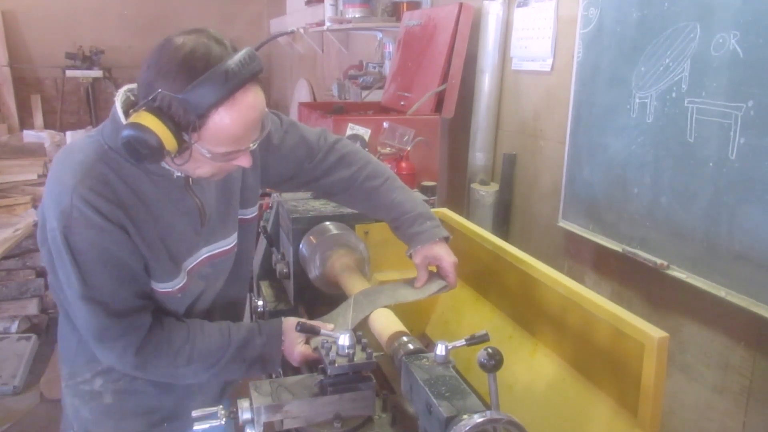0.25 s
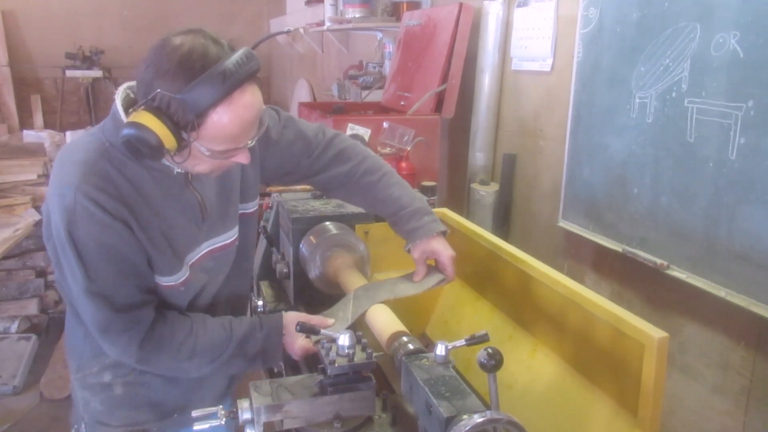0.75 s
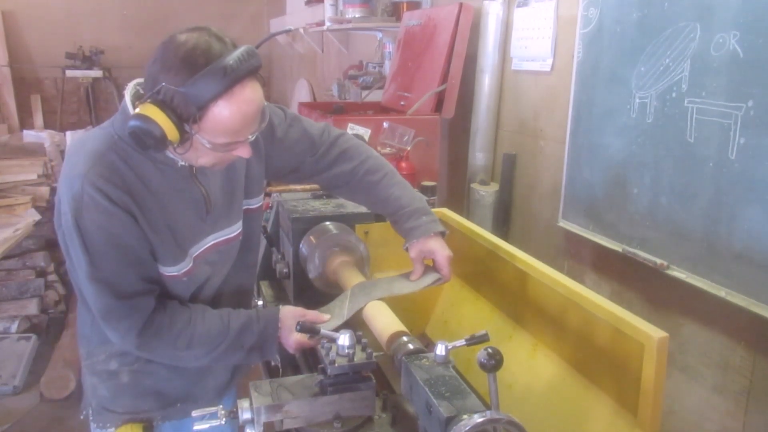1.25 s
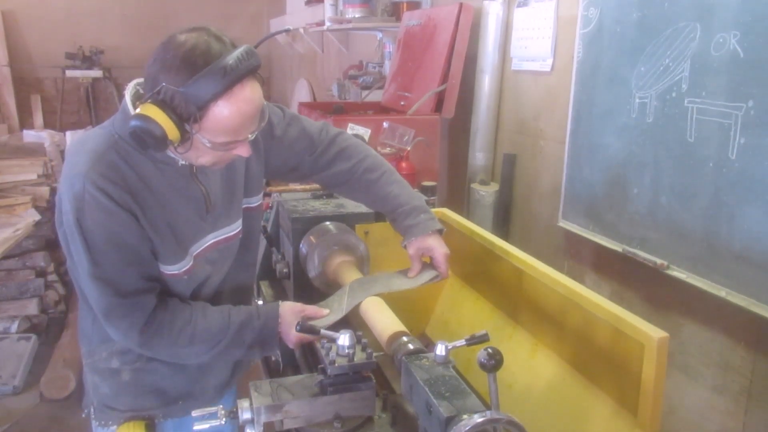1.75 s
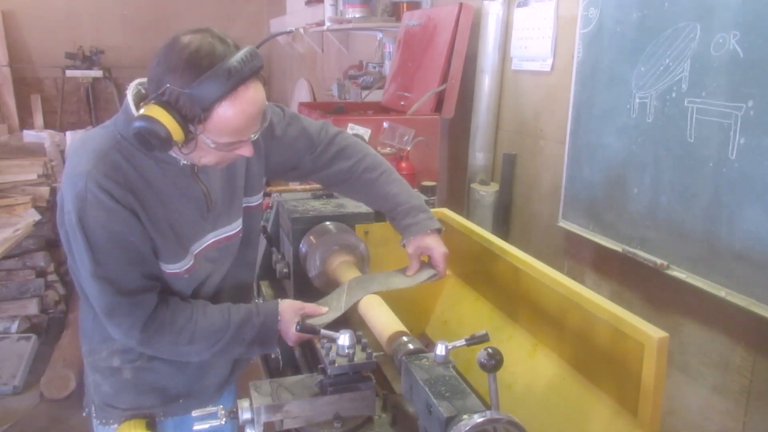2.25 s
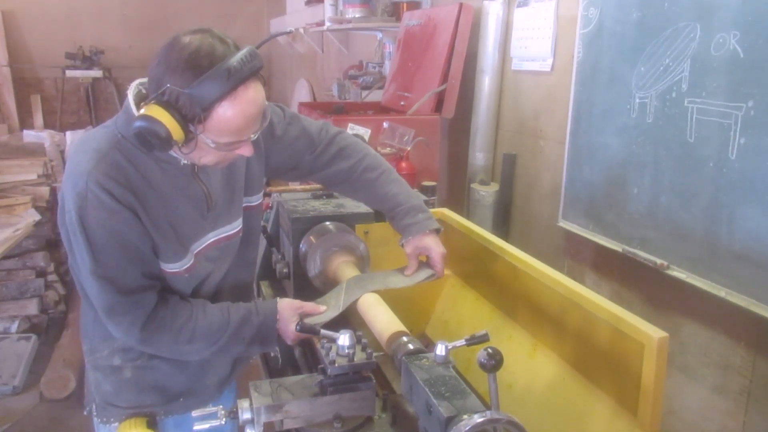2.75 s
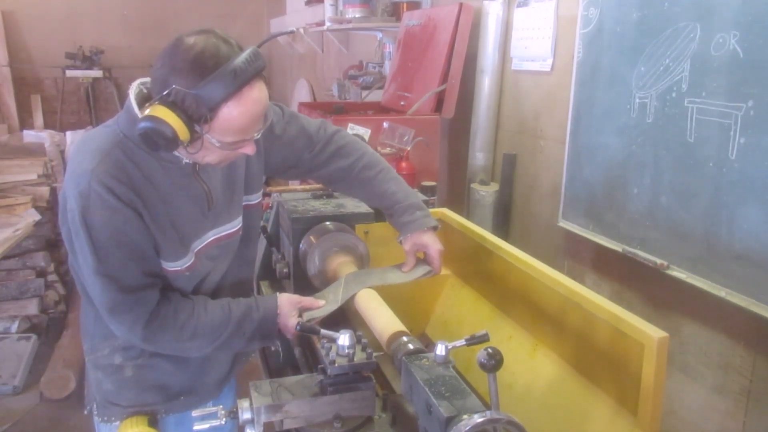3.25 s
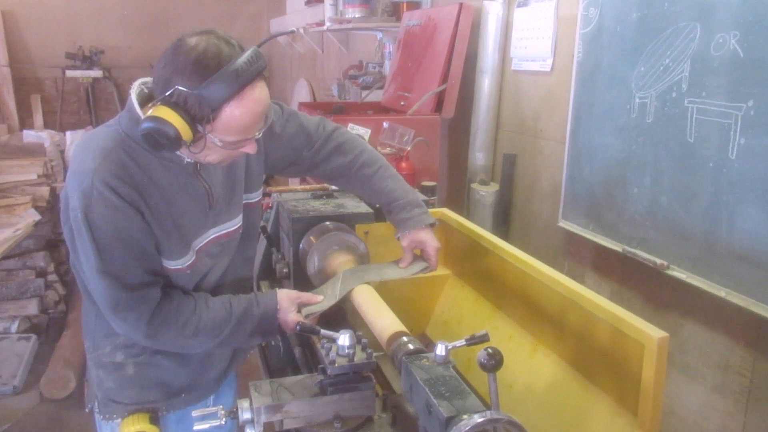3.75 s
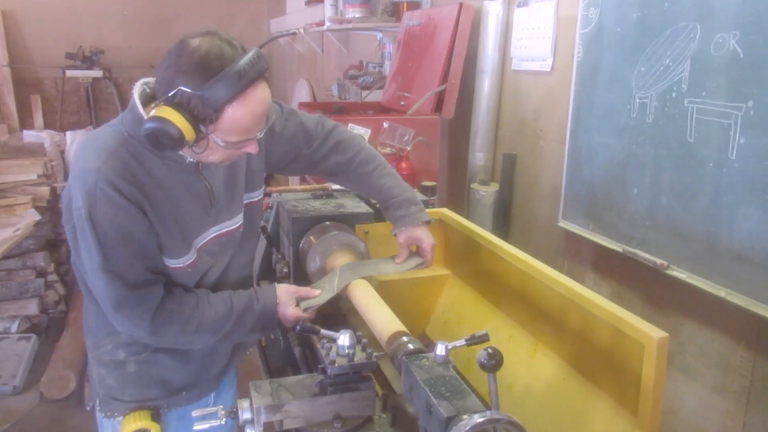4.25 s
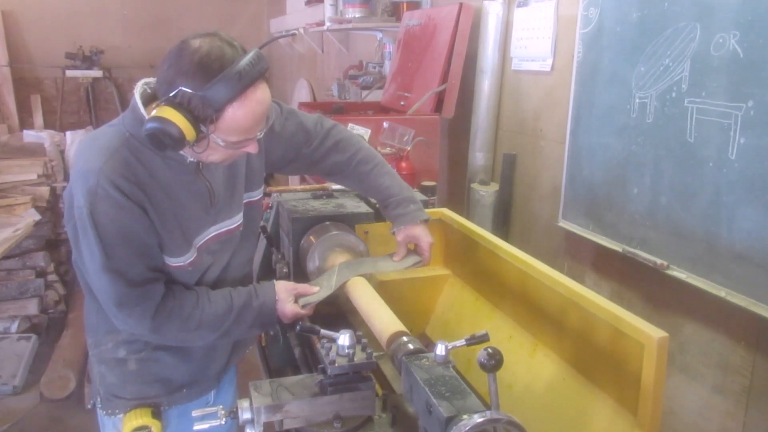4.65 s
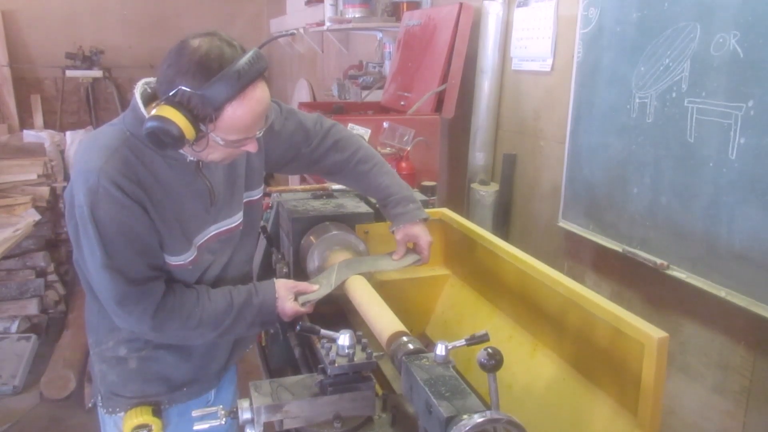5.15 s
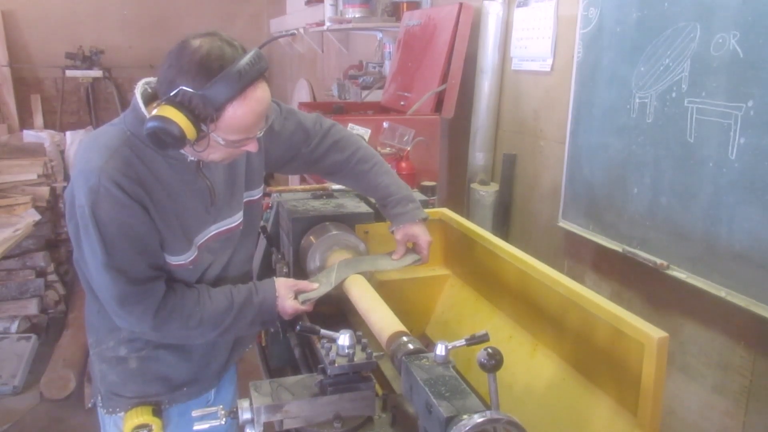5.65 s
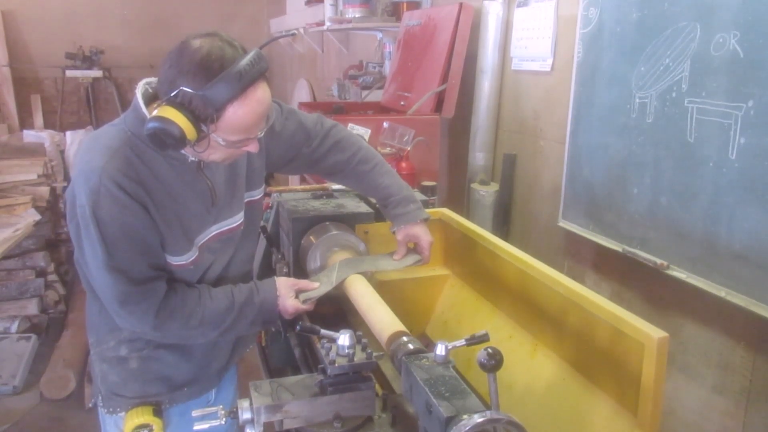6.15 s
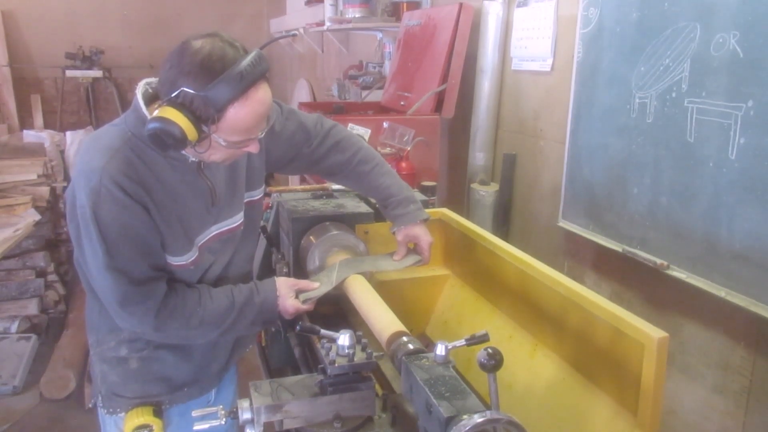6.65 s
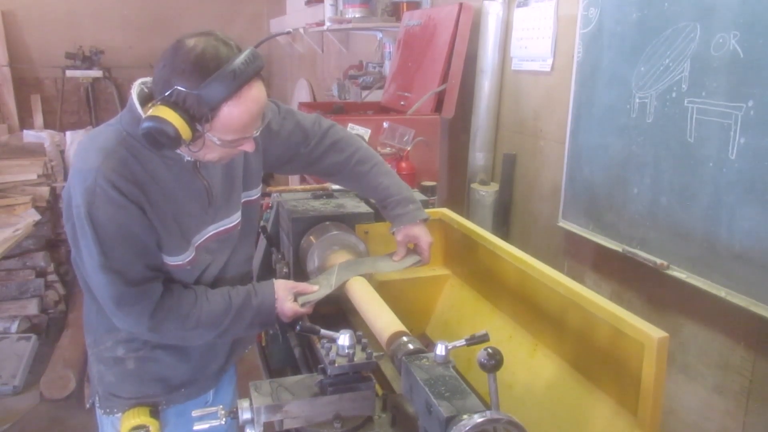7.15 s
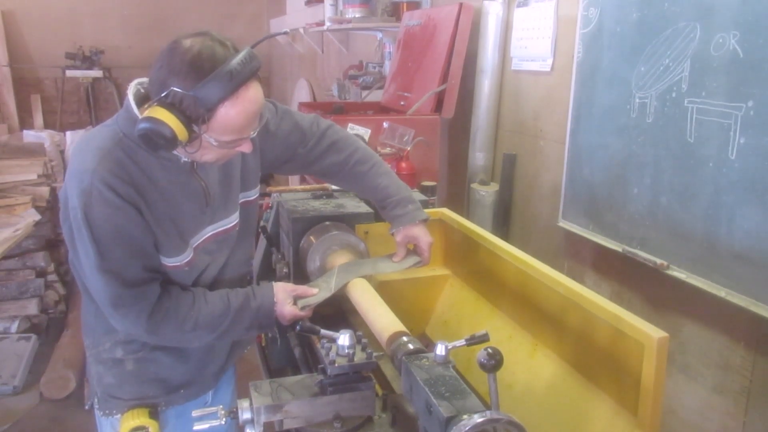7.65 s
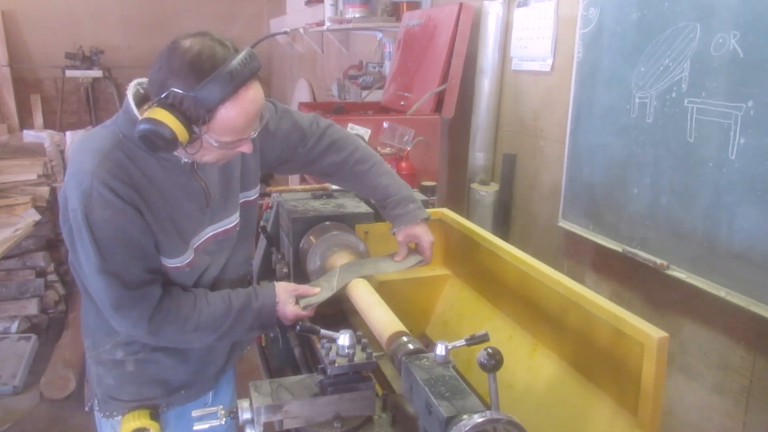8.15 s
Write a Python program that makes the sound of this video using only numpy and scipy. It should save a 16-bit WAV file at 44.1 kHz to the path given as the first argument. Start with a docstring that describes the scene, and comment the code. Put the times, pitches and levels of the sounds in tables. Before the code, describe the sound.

Abrasive cloth rasps continuously along a spinning wooden dowel, pulsing quickly with each turn, over a lathe's steady gear hum in a workshop.

```python
"""Abrasive cloth drawn along a spinning wooden dowel: shaped noise, coloured by resonances that change
with the cloth's place on the lathe and throbbing once a turn. Under it, motor and gears hum as sines
over a low noise rumble. Snaps of grit are short tone bursts, each followed by a dip of the whole sound.
Sparse decaying taps give the workshop's reverberation. One microphone, both channels alike."""
import sys
import numpy as np
from scipy import signal
from scipy.io import wavfile
from scipy.ndimage import uniform_filter1d

SR = 44100
rng = np.random.default_rng(int(sys.argv[2]) if len(sys.argv) > 2 else 0)


def to_wav(sig):
    """Store sig (one row per channel, or 1-D mono) as 16-bit WAV at the path in sys.argv[1].

    Samples outside -1..1 are clipped; the rate is SR.
    """
    pcm = np.clip(np.atleast_2d(sig), -1, 1) * 32767
    pcm = np.round(pcm).astype(np.int16)
    wavfile.write(sys.argv[1], SR, pcm.T)  # frames by channels


N = 371322  # samples

# Motor and gear tones, before load and dips: [f/Hz, rms level/dB]
MACHINE_TONES = [(88.5, -69), (95.6, -69), (104.1, -67), (120, -58), (150, -65), (210, -52), (224.9, -56),
                 (240, -36), (255.5, -52), (325.6, -56.5), (360, -46), (381.3, -52), (414.2, -50),
                 (438, -45), (446.2, -42), (455.5, -45), (469.4, -29.5), (478.2, -42), (501.2, -47),
                 (557.5, -46), (589.1, -51), (635.8, -47), (784.9, -52), (938.5, -46.5), (1273.1, -50),
                 (1325.5, -47), (1513.3, -40), (1922.6, -40.5), (2038.4, -40.5), (2261.9, -41),
                 (2269.9, -37.5), (2390.2, -34.5), (3026.5, -30.3), (4979.6, -47)]
# Spectral shape of the drive's rumble: [f/Hz, relative density/dB]
RUMBLE_SHAPE = [(25, -46), (60, -34), (100, -25), (180, -17.5), (250, -12.5), (350, -10), (460, -3),
                (560, -6), (750, -8), (950, -5.5), (1150, -6.5), (1600, -13.5), (3000, -30)]
# Spectral shape of the grit's rasp: [f/Hz, relative density/dB]
RASP_SHAPE = [(500, -46.5), (1000, -19), (1500, -10.5), (2000, -4), (2400, -2.5), (3000, -4), (3500, -7.5),
              (4200, -8.5), (5200, -6), (7000, -7.5), (8500, -11), (10500, -16), (13000, -23.5),
              (15000, -29.5)]
# Fixed resonances of dowel and bed, and the notches between them: [f/Hz, width/Hz, lift/dB]
BODY_MODES = [(460, 50, 4), (540, 30, 3), (640, 30, 3), (900, 110, 3), (1040, 60, -3), (1330, 60, 3),
              (1507, 90, 2), (1880, 90, 2), (1965, 70, -3), (2530, 80, -2), (2153, 90, 2.3), (2290, 90, 3),
              (2425, 90, 3), (2650, 130, 3), (3020, 120, 3), (3229, 120, 2), (4521, 90, 2), (4909, 90, 2),
              (5512, 90, 2.6), (6158, 90, 2.5), (6665, 90, 3.8), (7450, 90, 2.8), (8656, 90, 2.4)]
# Resonances heard only with the cloth near one place: [f/Hz, lift/dB, place/(0 start to 1 chuck)]
PLACE_MODES = [(3820, 4, .02), (4870, 4, 0), (630, 8, .2), (1710, 5, 0.3), (3830, 6.5, 0.39),
               (1164, 9, 0.34), (4700, 1.5, 0.3), (6220, 1.5, .37), (2630, 2.5, 0.53), (1464, 10, 0.5),
               (3380, 6.5, 0.55), (7800, 0.5, 0.45), (2390, 3.5, 0.82), (4540, 1.5, 0.72), (4120, 4, 0.9),
               (772, 5, 0.79), (870, 1, .9), (5430, 1.5, 0.75), (1890, 1.5, 0.84), (910, 3.5, 1.01),
               (1020, 5, 1.01), (1880, 3.5, 1.01), (2300, 7, 1.01), (2990, 4, 1), (3229, 3, 0.9),
               (3703, 7, 1.01), (4520, 7, 1), (4990, 5, 0.98), (5290, 5.5, 0.96), (6320, 4.5, 1.01),
               (6750, 4, 1.01), (7150, 4, 0.95)]
# The hands on the cloth: [t/s, pressure level/dB, extra treble level/dB]
HAND_PRESSURE = [(0, -1, -3.5), (.5, -0.5, -3.5), (1.1, -0.5, -3), (1.6, -1.5, -3.5), (2.5, 0.56, -4.5),
                 (3.2, -0.26, -3), (3.9, -1, -2), (4.4, -0.4, -4), (4.9, -2, -2.2), (6, -1.5, -2.5),
                 (6.8, -2.3, -1.5), (6.92, -3.5, -3), (7.5, -1.55, -3.5), (8.42, -1.6, -3.5)]
# Sharp snaps of grit: [t/s, peak level before dips/dB]
GRIT_SNAPS = [(.772, -12.5), (.946, -12), (2.337, -8.5), (2.795, -11.5), (3.747, -7.5), (4.412, -11.3),
              (6.049, -12), (6.624, -12.5)]
# Load on the gear pair that sings loudest: [t/s, level change/dB]
GEAR_LOAD = [(0, -2), (1, -0.5), (2.3, 0.5), (3.5, 1.5), (5.2, 0.5), (6.3, 0.5), (8.42, 1)]

RUMBLE_DB, RASP_DB = -31, -16.5  # rms levels ahead of the mix
SPINDLE_HZ, PULLEY_HZ = 13.512, 7.9
THROB_PHASE_TURNS = .56
# throb depth at the start of travel, at the chuck, and its wander; each band takes a share
THROB_DB, THROB_CHUCK_DB, THROB_WANDER_DB = 0.76, 1.73, 0.22
TREBLE_HZ = 3800  # where the rasp divides into body and treble
# cloth travel; places run from 0 (start) to 1 (chuck)
ARRIVE_S, LEAVE_S, SLIP, SLIP_S, RETURN_PER_S = 6.1, 6.84, 0.086, .06, .14
# span of places over which a mode rings, for modes at place 0 and at place 1
RING_REACH, RING_REACH_CHUCK = 0.38, 0.11
RING_WIDTH_HZ, RING_WIDTH_SHARE = 21, 0.026  # mode width: fixed part, and part per Hz of frequency
DROP_FROM_DB, DROP_PER_DB = -14.5, 0.5069  # snap level where dips begin; dip dB per snap dB above it
EDGE_HZ = 15030  # upper band limit


def gain_of(db):
    """Decibels to an amplitude factor."""
    return 10 ** (np.asarray(db) / 20)


def evened(x):
    """Scale to rms 1."""
    return x / np.sqrt(np.mean(x ** 2) + 1e-20)


def read(points, hz):
    """Read a spectrum table at the given frequencies, along a logarithmic axis."""
    f, value = np.transpose(points)
    return np.interp(np.log(hz + 1), np.log(f + 1), value)


def bump(x, centre, width):
    """A smooth peak of height 1 with the given width at half height."""
    return .5 ** ((2 * (x - centre) / width) ** 2)


def drift(shape, size):
    """Smooth random field of rms 1; size = samples averaged, twice over, along each axis."""
    field = rng.standard_normal(shape)
    for axis, count in enumerate(size):
        for _ in range(2):
            field = uniform_filter1d(field, count, axis)
    return evened(field)


def noise(field_db, hop):
    """Noise from random short-time spectra shaped by a frames x bins field of dB."""
    real, imaginary = rng.standard_normal((2,) + field_db.shape)
    spectra = (real + 1j * imaginary) * gain_of(field_db)
    return signal.istft(spectra.T, nperseg=4 * hop, noverlap=3 * hop)[1][:N]


def grid(hop):
    """Frame times (s) and bin frequencies (Hz)."""
    return np.arange(N // hop + 5) * hop / SR, np.fft.rfftfreq(4 * hop, 1 / SR)


def place(t):
    """The cloth travels steadily to the chuck, rests there, slips off quickly and comes back."""
    after = np.maximum(t - LEAVE_S, 0)
    travel = np.minimum(t / ARRIVE_S, 1)
    slipped = SLIP * np.minimum(after / SLIP_S, 1)
    return travel - slipped - RETURN_PER_S * after


def ringing(t, hz):
    """Lift in dB of the fixed resonances and of those that the cloth's place wakes."""
    at = place(t)[:, None]
    lift_db = sum(db * bump(hz, f, width) for f, width, db in BODY_MODES)
    for f, db, best in PLACE_MODES:
        reach = RING_REACH + (RING_REACH_CHUCK - RING_REACH) * best
        width_hz = RING_WIDTH_HZ + RING_WIDTH_SHARE * f
        lift_db = lift_db + db * bump(at, best, reach) * bump(hz, f, width_hz)
    return lift_db


def throb(share, early_turns, depth_db):
    """The dowel runs slightly out of true: the cloth bites harder once a turn."""
    t = np.arange(N) / SR
    turn = 2 * np.pi * (SPINDLE_HZ * t - THROB_PHASE_TURNS + early_turns)
    shape = np.cos(turn) + 0.53 * np.cos(2 * turn + 3.7) + 0.38 * np.cos(3 * turn + 0.71)
    return gain_of(share * depth_db * shape)


def rasp():
    """Countless grains scratch the wood; the noise takes the colour of whatever rings at that moment."""
    t, hz = grid(hop=256)
    s, *columns = np.transpose(HAND_PRESSURE)
    pressure_db, bright_db = (np.interp(t, s, c)[:, None] for c in columns)
    treble = 1 / (1 + (TREBLE_HZ / (hz + 1)) ** 6)
    field = read(RASP_SHAPE, hz) + pressure_db + treble * bright_db + ringing(t, hz)
    # many weak modes come and go
    field += 1.06 * drift(field.shape, size=[90, 2])
    # wide patches flicker as the cloth slips, more so the higher the frequency
    field += (0.39 + 0.62 * hz / 10000) * drift(field.shape, size=[5, 90])
    scratch = noise(field, hop=256)
    high_pass = signal.butter(2, TREBLE_HZ, "high", fs=SR, output="sos")
    top = signal.sosfiltfilt(high_pass, scratch)
    depth_db = THROB_DB + (THROB_CHUCK_DB - THROB_DB) * place(t)
    depth_db += THROB_WANDER_DB * drift(len(t), size=[40])
    depth_db = np.interp(np.arange(N) / SR, t, depth_db)
    # the treble throbs deeper and a little earlier in the turn
    body = (scratch - top) * throb(0.69, 0, depth_db)
    top = top * throb(0.87, 0.083, depth_db)
    return gain_of(RASP_DB) * evened(body + top)


def tones():
    """Sines at motor and gear rates; all flutter and beat with the pulley, the mains hum least."""
    t, steps, out = np.arange(N) / SR, np.arange(0, N + 512, 512), np.zeros(N)
    for hz, db in MACHINE_TONES:
        mains = abs(hz / 120 - round(hz / 120)) < .003  # multiples of 120 Hz
        share = .05 if mains else .15 if hz < 1000 else .1
        a, b = (np.interp(np.arange(N), steps, drift(len(steps), size=[3])) for _ in range(2))
        beat = 1.57 * share * np.cos(2 * np.pi * (PULLEY_HZ * t + rng.random()))
        flutter = share * (a + 1j * b)
        wave = (1 + beat + flutter) * np.exp(2j * np.pi * (hz * t + rng.random()))
        # load acts on the gear group around its loudest tone
        load_db = np.interp(t, *np.transpose(GEAR_LOAD)) * (400 < hz < 520)
        out += gain_of(db + load_db) * evened(wave.real)
    return out


def rumble():
    """Bearings, belt, gears and the bending dowel: low noise with lasting narrow ridges."""
    t, hz = grid(hop=1024)
    ridges = drift((len(t), len(hz)), size=[30, 1])
    field = read(RUMBLE_SHAPE, hz) + ringing(t, hz) + 2.0 * ridges
    return gain_of(RUMBLE_DB) * evened(noise(field, hop=1024))


def workshop(x):
    """Sparse taps of random sign die away; two such tails take turns as the hands and body shift."""
    at = np.arange(130, 13000, 20) + rng.integers(0, 20, (2, 644))  # tap delays in samples
    taps = np.zeros((2, 13100))
    decay = gain_of(-60 * at / SR / 0.29)  # 60 dB down in 0.29 s
    np.put_along_axis(taps, at, rng.choice([-1., 1.], at.shape) * decay, 1)
    lean = np.pi * np.arange(N) / SR / 4.0
    dull = signal.lfilter([.45], [1, -.55], x)  # wood and cloth in the room soak up treble
    fed = dull * np.array([np.cos(lean), np.sin(lean)])
    return signal.oaconvolve(fed, taps / np.linalg.norm(taps[0]), axes=1)[:, :N].sum(0)


def repeated(x, share):
    """The same wood and teeth come round again: a little sound recurs each turn, less in the treble."""
    lag = round(SR / SPINDLE_HZ)
    dull = signal.lfilter([.4], [1, -.6], x)
    out = np.zeros(N)
    out[lag:] += share * dull[:-lag]
    out[2 * lag:] += 0.26 * share * dull[:-2 * lag]
    return x + out


def snaps():
    """Very short bursts in the strongest resonance region, and the level dip that follows each."""
    t, out, dip_db = np.arange(N) / SR, np.zeros(N), np.zeros(N)
    for s, db in GRIT_SNAPS:
        out += gain_of(db) * np.cos(2 * np.pi * 2600 * (t - s)) * bump(t, s, 0.00035)
        after = np.maximum(t - s - .001, 0)
        # drops within milliseconds, creeps back over about a second
        course = (1 - np.exp(-after / 0.0033)) * np.exp(-after / 0.44)
        dip_db -= DROP_PER_DB * (db - DROP_FROM_DB) * course
    return out, gain_of(dip_db)


def scene():
    """Cloth, machine, snaps and room all reach one microphone; the dips act on their sum."""
    snap, dip = snaps()
    noisy = repeated(rumble() + rasp(), 0.055)
    direct = gain_of(-0.26) * noisy
    room = gain_of(-5.5) * workshop(noisy)
    mono = dip * (tones() + direct + room + snap)
    return np.array([mono, mono])


def record(dry):
    """Limit the band with a steep linear-phase low-pass."""
    low_pass = signal.firwin(1023, EDGE_HZ, window=("kaiser", 9), fs=SR)
    return signal.oaconvolve(dry, low_pass[None], "same")


dry = scene()
out = record(dry)
to_wav(out)
```